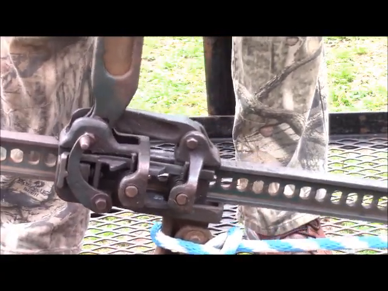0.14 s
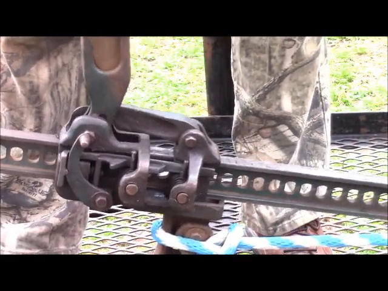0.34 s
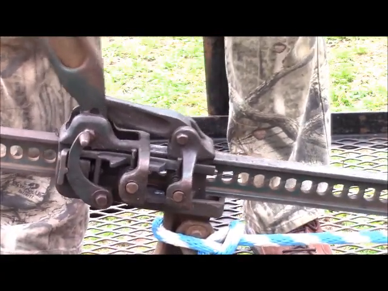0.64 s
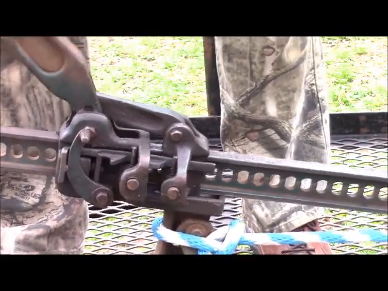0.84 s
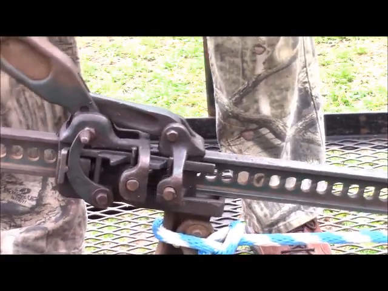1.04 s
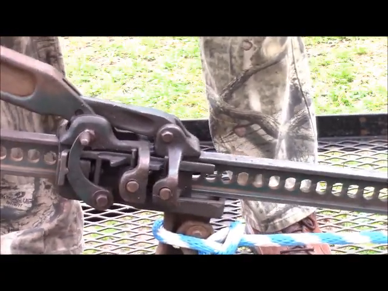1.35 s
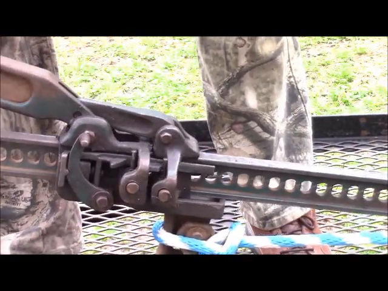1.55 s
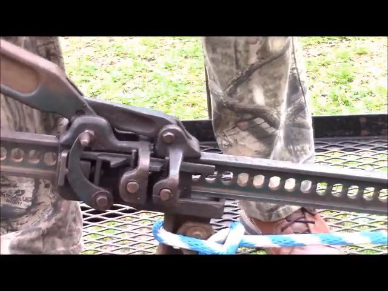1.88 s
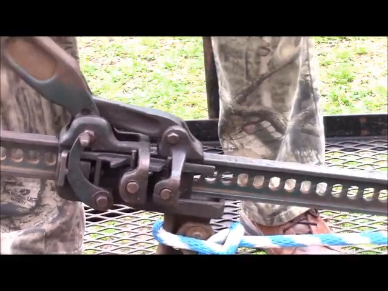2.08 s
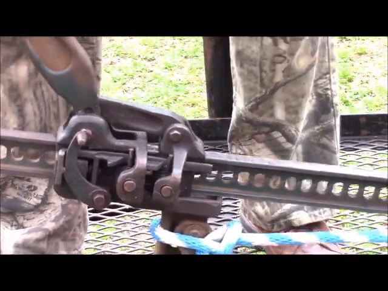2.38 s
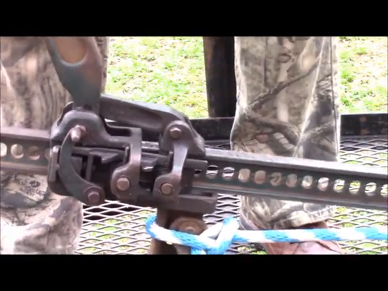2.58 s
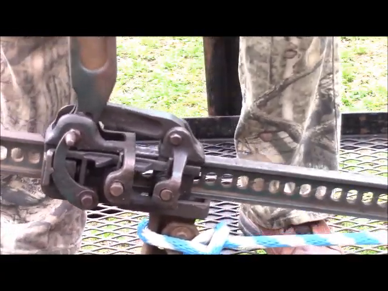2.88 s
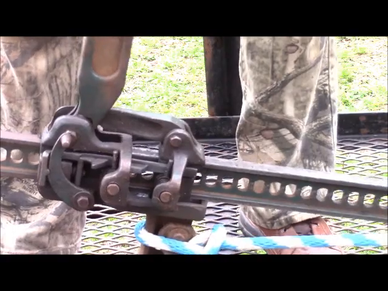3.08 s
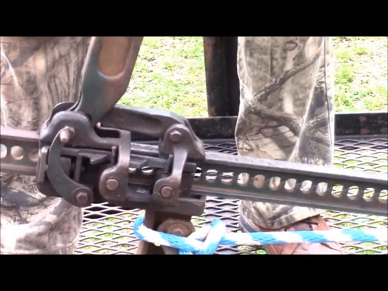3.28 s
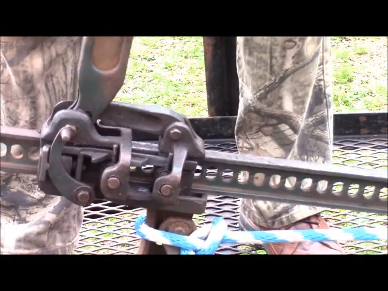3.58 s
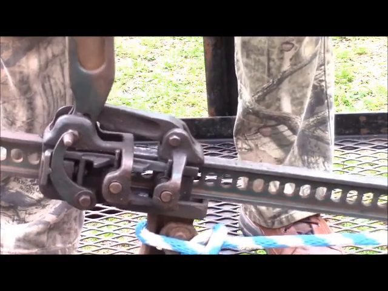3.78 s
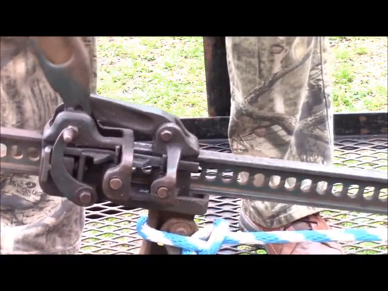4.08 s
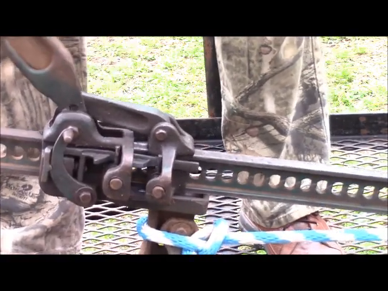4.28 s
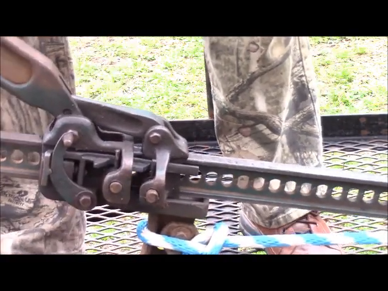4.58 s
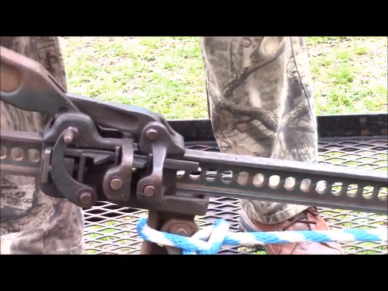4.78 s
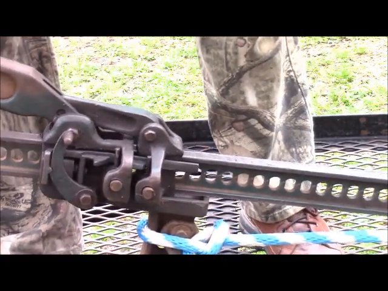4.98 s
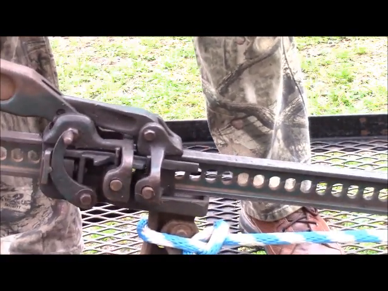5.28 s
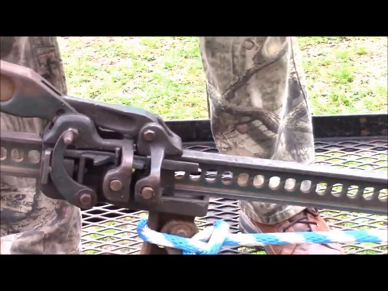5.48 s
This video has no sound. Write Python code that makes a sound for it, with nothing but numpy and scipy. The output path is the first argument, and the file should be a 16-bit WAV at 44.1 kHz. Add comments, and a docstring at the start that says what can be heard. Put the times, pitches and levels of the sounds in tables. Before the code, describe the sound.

A steel lever jack clacks sharply three times outdoors, with lighter linkage clinks, knocks and scrapes between the snaps.

```python
"""A lever jack's sprung pin snaps into hole after hole and sets the steel bar clanging, close up,
as the jack winches a load onto a steel mesh trailer. On each stroke the slack linkage knocks and
clinks and the runner scrapes along the bar; once, a loaded pivot squeaks. The deck thuds as the
weight shifts, and a low outdoor hum lies under it all."""
import sys
import numpy as np
from scipy import signal
from scipy.fft import rfft, irfft
from scipy.io import wavfile

SR = 44100
rng = np.random.default_rng(int(sys.argv[2]) if len(sys.argv) > 2 else 0)


def wav_out(sig):
    """Save sig, one row per channel (or a flat mono array), as 16-bit PCM at SR to the path in sys.argv[1]."""
    wavfile.write(sys.argv[1], SR, np.round(np.clip(np.atleast_2d(sig).T, -1, 1) * 32767).astype(np.int16))


N = 248724

# spectrum of the outdoor bed: freq_hz, gain_db
AIR_COLOUR = [(12, -67), (20, -39.5), (96, -15), (110, -5.5), (134, -2.5), (255, -9), (328, -12),
              (459, -13), (607, -18), (1060, -18.5), (1190, -21), (1330, -21.5), (2530, -29.5),
              (2990, -28.5), (16000, -44.5)]
# stereo width of the bed, side against middle: freq_hz, side_db
AIR_SIDE = [(120, -24), (500, -11), (2000, -7.5), (14000, -12.5)]
# pulls on the handle: start_s, length_s
HANDLE_PULLS = [(0.395, 2.4), (3.95, 1.1)]
# tails of the yard and of the trailer frame: freq_hz, t60_s
YARD_DECAY = [(200, 1.0), (1500, 0.51), (7000, 0.37), (13000, 0.4)]
FRAME_DECAY = [(200, 0.52), (8000, .07)]
# the deck gives under the load: start_s, level_db, rise_s
DECK_THUDS = [(.85, -56.5, 0.0089), (1.3395, -38.5, .003), (1.884, -57, 0.03), (2.215, -56, .01),
              (4.35, -53.5, .01), (4.405, -48.5, .02)]
# boom of the deck: freq_hz, gain_db
DECK_COLOUR = [(25, -34.5), (60, -19), (110, -8), (205, 2.5), (270, -4.5), (350, -13.5), (650, -13),
               (1200, -28), (4000, -53.5)]
# steel sliding on steel, and scuffs on the mesh: start_s, length_s, level_db, treble_db
SLIDES = [(0.621, .13, -56.5, 10.5), (1.209, 0.094, -49.5, -9.5), (1.7, 0.19, -58.5, 2),
          (1.841, 0.14, -55, 5), (2.519, .13, -58.5, 13.5), (4.087, 0.13, -63, 9.5),
          (4.241, 0.073, -61.5, -12), (4.37, 0.089, -54, 1)]
# rasp of a slide: freq_hz, gain_db
SLIDE_COLOUR = [(100, -13.5), (400, 16), (900, 2.5), (1600, 2), (2600, -4), (4500, -14), (7000, -12.5),
                (10000, -26.5), (15000, -28)]
# modes of the steel bar and frame: pitch_hz, level_db, t60_s
BAR_MODES = [(216.5, -4, .6), (267.3, -1, .85), (436, -2.5, 0.73), (769, -2.5, 0.37), (908, -7.5, .4),
             (1159, -11.5, 0.53), (1342, -4, 0.26), (1554, -6.5, 0.23), (1614, -3.5, .25), (1690, -9, 0.18),
             (2070, -9, .52), (2213, -4, 0.22), (2420, -6, .2), (2904, -1.5, .16), (3040, -11, 0.5),
             (3580, -5.5, .2), (4600, -16, 0.17), (5190, -4, .19), (5450, -13, 0.42), (7140, -18.5, .25),
             (11640, -19, .33), (12670, -20, .22)]
# decay of the dense ring between those modes: freq_hz, t60_s
RING_DECAY = [(100, .4), (300, 0.42), (900, .25), (2000, 0.15), (4000, .14), (7500, 0.079), (14000, 0.052)]
# the linkage takes up its slack; hardness is a treble shelf: start_s, level_db, hardness_db, note_hz
LINKAGE_KNOCKS = [(.1701, -48.5, 5.5, 759), (.1956, -49, -28, 960), (.2235, -47, -26, 1820),
                  (.659, -47.5, 10, 1690), (.684, -48.5, 9, 2330), (.8331, -60, -6, 1890),
                  (.9855, -37, 4.5, 1615), (1.2794, -42.5, 15, 3540), (1.3323, -41, -15, 1530),
                  (1.6735, -46, -1, 1490), (1.6981, -42, -2.5, 1890), (2.1719, -40.5, -16, 1090),
                  (2.209, -45, -6.5, 1200), (2.402, -47, -2, 2270), (2.4137, -48.5, 14.5, 2890),
                  (3.011, -47, 7, 2980), (3.6763, -47.5, 7.5, 700), (3.7136, -39.5, -8, 1877),
                  (4.0952, -57.5, -14, 1207), (4.1175, -52.5, -1.5, 1135), (4.1431, -52, 9.5, 2300),
                  (4.3434, -49, 6, 3420), (4.558, -37.5, 5, 1339), (4.6859, -55.5, -15.5, 1600),
                  (5.554, -57, -13, 2190)]
# the body that all knocks share: freq_hz, gain_db
KNOCK_BODY = [(50, -31.5), (150, -19), (270, 0.5), (600, 0), (1100, 2.5), (1700, 2.5), (2600, -4),
              (3200, -4.5), (4100, -13.5), (5200, -14), (7200, -16), (8500, -23.5), (15000, -45.5)]
# a struck link rings like a short free bar: pitch_ratio, level_db, t60_s
LINK_MODES = [(1, -3.5, .1), (2.7, -13, 0.055), (5.6, -24, .04)]
# bright body of the bar's clang and the pin's crack: freq_hz, gain_db
CLANG_BODY = [(40, -25.5), (130, -26), (260, -10), (600, -6.5), (1500, -4), (2300, -0.5), (3500, -1),
              (4150, -4.5), (5300, -0.5), (6000, -4), (7200, 4), (8600, -6.5), (10500, -7), (15000, -23.5)]
# modes of a pin: pitch_hz, level_db, t60_s
PIN_MODES = [(3340, -16, 0.0051), (5270, -17.5, 0.0046), (6290, -13.5, 0.01), (7524, -8, 0.0095),
             (8220, -7, 0.012), (8740, -15, .009), (10400, -19, 0.0063), (11220, -19, 0.0069)]
# a pin ticks on the bar as it rides to the next hole: start_s, level_db
RIDING_TICKS = [(.663, -45), (2.4135, -31.5), (2.4438, -45), (4.125, -48)]
# a pin snaps into its hole and shakes the bar:
# start_s, pin_db, sheen_db, clang_db, bass_db, ring_ratio, note_hz, lift_db
PIN_SNAPS = [(1.2894, -0.6, -4.5, -29.5, -1, 1.14, 1540, 7), (3.0231, -.9, 5.5, -24, 0, 1.37, 1130, 7),
             (4.7836, -1.4, -4, -28, -7, 1.11, 847, 14)]

AIR_DB, PULL_SWELL_DB = -60.5, 1.5
SQUEAK_S, SQUEAK_DB, SQUEAK_HZ = 4.342, -38, 1615
SLIP_GAP_S, SLIP_FADE_DB = .02, -3.5
KNOCK_BASS_DB, KNOCK_LIFT_DB = 1.5, 5
KNOCK_RING_RATIO, HARDNESS_DB_PER_DOUBLING = .86, 29.5
GRAZE_LEAD_S, GRAZE_DB, GRAZE_PITCH_RATIO = .0016, -13.5, 1.07
REBOUND_S, REBOUND_DB = .00105, -11
EDGE_HZ = 16000
RING_T = np.arange(2 ** 15) / SR  # time axis of one hit, in seconds


def gain_of(db):
    """Decibels to amplitude."""
    return 10 ** (np.asarray(db) / 20)


def unit_rms(x):
    """Scales to rms 1."""
    return x / np.sqrt(np.mean(x ** 2) + 1e-20)


def read(points, hz):
    """Reads a table along a logarithmic frequency axis."""
    f, value = np.transpose(points)
    return np.interp(np.log(hz + 1), np.log(f + 1), value)


def add(mix, start_s, sound):
    """Mixes a sound in at its cue."""
    part = mix[max(round(start_s * SR), 0):][:len(sound)]
    part += sound[:len(part)]


def coloured(x, curve, size=4096):
    """Causal EQ whose gain in dB is curve(hz)."""
    log_gain = np.log(gain_of(curve(abs(np.fft.fftfreq(size, 1 / SR)))))
    taps = np.fft.ifft(np.exp(np.conj(signal.hilbert(log_gain)))).real[:size // 2]
    return signal.fftconvolve(x, taps)[:len(x)]


def shelf(hz, corner_hz):
    """Rises smoothly from 0 below the corner to 1 above it."""
    return hz ** 4 / (hz ** 4 + corner_hz ** 4)


def fade(t60_s, t=RING_T):
    """Decay envelope, 60 dB down at t60_s."""
    return np.exp(-np.log(1000) * t / t60_s)


def attack(rise_s, t=RING_T):
    """Onset envelope, easing from 0 to 1."""
    return 1 - np.exp(-t / rise_s)


def burst(t60_s, t=RING_T):
    """A dying burst of white noise."""
    return rng.standard_normal(len(t)) * fade(t60_s, t)


def dense_ring(decay, ring_ratio=1):
    """Countless modes: noise in overlapping bands, each dying at its own speed."""
    hz = np.fft.rfftfreq(len(RING_T), 1 / SR)
    spectrum = rfft(rng.standard_normal(len(RING_T)))
    centres, t60s = np.transpose(decay)
    bands = [irfft(spectrum * read(np.c_[centres, share], hz)) for share in np.eye(len(decay))]
    return sum(band * fade(t60 * ring_ratio) for band, t60 in zip(bands, t60s))


def modes(table, t, pitch=1, spread_db=0):
    """Damped sines; with a spread, every blow shares its force out differently."""
    scatter = spread_db * rng.standard_normal((len(table), 2))
    return sum(gain_of(db + offset_db) * fade(t60, t) * np.sin(2 * np.pi * hz * pitch * t + phase)
               for (hz, db, t60), (offset_db, phase) in zip(table, scatter))


def air(waver_db=0.5):
    """A low, gently wavering outdoor bed that swells a little during each pull on the handle."""
    t = np.arange(N) / SR
    waver = sum(np.sin(2 * np.pi * (f * t + rng.random())) / np.sqrt(f) for f in np.geomspace(1, 10, 10))
    pull = sum(np.sin(np.pi * np.clip((t - start) / length, 0, 1)) for start, length in HANDLE_PULLS)
    colour = gain_of(read(AIR_COLOUR, np.fft.rfftfreq(N, 1 / SR)))
    hum = irfft(rfft(rng.standard_normal(N)) * colour, N)
    return unit_rms(hum) * gain_of(AIR_DB + PULL_SWELL_DB * pull + waver_db * unit_rms(waver))


def reverb(send, decay, rise_s=0.0055):
    """A thin tail from the trailer frame or the yard."""
    tail = dense_ring(decay) * attack(rise_s)
    return signal.fftconvolve(send, tail / np.linalg.norm(tail))[:N]


def deck_thuds(t60_s=0.28):
    """Dull booms of the trailer bed as the weight shifts."""
    out = np.zeros(N)
    for start_s, db, rise_s in DECK_THUDS:
        boom = coloured(burst(t60_s) * attack(rise_s), lambda hz: read(DECK_COLOUR, hz))
        add(out, start_s, gain_of(db) * boom / np.std(boom[:2 ** 11]))
    return out


def scrapes(grains_per_s=900, hiss_db=-16):
    """Steel on steel: tiny slips of uneven size swell and fade with each slide."""
    out = np.zeros(N)
    for start_s, length_s, db, treble_db in SLIDES:
        size, hiss = rng.standard_normal((2, len(RING_T)))
        slips = size * (rng.random(len(RING_T)) < grains_per_s / SR) + gain_of(hiss_db) * hiss
        rasp = coloured(slips, lambda hz: read(SLIDE_COLOUR, hz) + treble_db * shelf(hz, 3000))
        swell = np.sin(np.pi * np.minimum(RING_T / length_s, 1))
        add(out, start_s, gain_of(db) * unit_rms(rasp) * swell)
    return out


def pivot_squeak(slips=4, detune=.03, rise_s=0.0013, overtone_db=-10, t60_s=.075):
    """A loaded pivot sticks and slips; each slip rings a link, weaker and at a slightly new pitch."""
    out = np.zeros(N)
    pressed_link = [(ratio, db + overtone_db * (ratio > 1), t60_s) for ratio, db, _ in LINK_MODES]
    for slip, chance in enumerate(rng.standard_normal(slips)):
        ring = modes(pressed_link, RING_T, SQUEAK_HZ * (1 + detune * chance)) * attack(rise_s)
        add(out, SQUEAK_S + slip * SLIP_GAP_S, gain_of(SQUEAK_DB + slip * SLIP_FADE_DB) * ring)
    return out


def knock_ring_ratio(hardness_db):
    """Harder contacts ring longer."""
    return KNOCK_RING_RATIO * 2 ** (hardness_db / HARDNESS_DB_PER_DOUBLING)


def link_clinks(overtone_share=.5):
    """The loose link clinks on its own note; soft contacts hardly reach its overtones."""
    out = np.zeros(N)
    for start_s, db, hardness_db, note_hz in LINKAGE_KNOCKS:
        overtone_db, ring_ratio = overtone_share * hardness_db, knock_ring_ratio(hardness_db)
        link = [(ratio * note_hz, mode_db + overtone_db * (ratio > 1), t60 * ring_ratio)
                for ratio, mode_db, t60 in LINK_MODES]
        add(out, start_s, gain_of(db) * modes(link, RING_T))
    return out


def steel_hits(hits, body, modes_db, contact_db, contact_t60_s, note_width_hz):
    """Struck steel: a contact burst, a dense ring and the bar's modes, coloured by where it is hit."""
    out = np.zeros(N)
    for start_s, db, bass_db, treble_db, ring_ratio, note_hz, lift_db in hits:
        def tone_db(hz):
            shelves = bass_db * (1 - shelf(hz, 760)) + treble_db * shelf(hz, 3400)
            note_peak = lift_db / (1 + ((hz - note_hz) / note_width_hz) ** 2)
            return read(body, hz) + shelves + note_peak

        contact = gain_of(contact_db) * burst(contact_t60_s)
        ring = dense_ring(RING_DECAY, ring_ratio)
        bar = gain_of(modes_db) * modes(BAR_MODES, RING_T, spread_db=2.5)
        hit = coloured(contact + ring + bar, tone_db)
        add(out, start_s, gain_of(db) * hit / np.std(hit[:2 ** 9]))  # the first 12 ms set the level
    return out


def linkage_knocks():
    """The linkage takes up its slack: the harder the contact, the brighter and longer the knock."""
    hits = [(start_s, db, KNOCK_BASS_DB, hard_db, knock_ring_ratio(hard_db), note_hz, KNOCK_LIFT_DB)
            for start_s, db, hard_db, note_hz in LINKAGE_KNOCKS]
    return steel_hits(hits, KNOCK_BODY, modes_db=-19.5, contact_db=6.5, contact_t60_s=.024,
                      note_width_hz=280)


def bar_clangs(lag_s=.0011, treble_db=1.0):
    """Each seating pin deals the bar a blow that sets it ringing."""
    hits = [(start_s + lag_s, db, bass_db, treble_db, ring_ratio, note_hz, lift_db)
            for start_s, _, _, db, bass_db, ring_ratio, note_hz, lift_db in PIN_SNAPS]
    return steel_hits(hits, CLANG_BODY, modes_db=-16, contact_db=-9, contact_t60_s=.025,
                      note_width_hz=81)


def pin_strikes():
    """A tick is one contact; a snap grazes the edge of the hole, seats and rebounds once."""
    strikes = [(start_s, db, 1, 0) for start_s, db in RIDING_TICKS]
    for start_s, db, sheen_db, *_ in PIN_SNAPS:
        strikes += [(start_s - GRAZE_LEAD_S, db + GRAZE_DB, GRAZE_PITCH_RATIO, sheen_db),
                    (start_s, db, 1, sheen_db),
                    (start_s + REBOUND_S, db + REBOUND_DB, 1, sheen_db)]
    return strikes


def pin_pings(rise_s=0.000073, crack_db=-17, crack_t60_s=.009, sheen_hz=11000):
    """The sprung pin hits steel: hard, very short pings with a crack of contact noise."""
    out, t = np.zeros(N), RING_T[:2 ** 11]
    for start_s, db, pitch_ratio, sheen_db in pin_strikes():
        crack = gain_of(crack_db) * coloured(burst(crack_t60_s, t), lambda hz: read(CLANG_BODY, hz))
        ping = (modes(PIN_MODES, t, pitch_ratio) + crack) * attack(rise_s, t)
        ping = coloured(ping, lambda hz: sheen_db * np.minimum(hz / sheen_hz, 1) ** 8)
        add(out, start_s, gain_of(db) * ping)
    return out


def scene(yard_db=-18, pin_send_db=-11, side_frame_db=-26, side_yard_db=-28):
    """The jack sits in the middle; only its tails and the outdoor bed have a little width."""
    pings = pin_pings()
    body = deck_thuds() + scrapes() + link_clinks() + pivot_squeak() + bar_clangs() + linkage_knocks()
    send = body + gain_of(pin_send_db) * pings  # small pins send less into the yard than the long bar
    mid = body + pings + gain_of(yard_db) * reverb(send, YARD_DECAY) + air()
    side = gain_of(side_frame_db) * reverb(send, FRAME_DECAY, rise_s=.001)
    side += gain_of(side_yard_db) * reverb(send, YARD_DECAY)
    side += coloured(air(), lambda hz: read(AIR_SIDE, hz))
    return np.array([mid + side, mid - side]) * gain_of([[.1], [-.1]])


def record(dry, ceiling=0.7):
    """The sharpest snaps clip softly; then a low-pass trims the very top."""
    clipped = dry / (1 + (dry / ceiling) ** 4) ** (1 / 4)
    low_pass = signal.firwin(255, EDGE_HZ, window=("kaiser", 9), fs=SR)
    return signal.oaconvolve(clipped, low_pass[None], "same")


dry = scene()
out = record(dry)
wav_out(out)
```